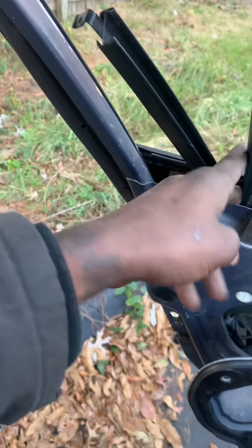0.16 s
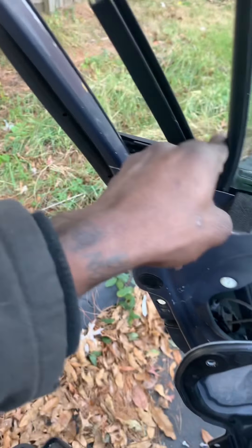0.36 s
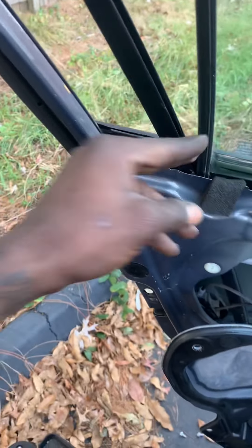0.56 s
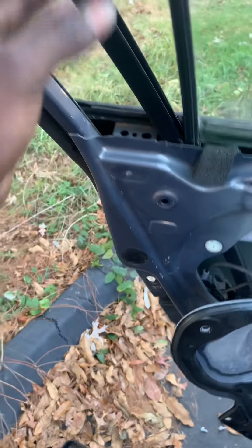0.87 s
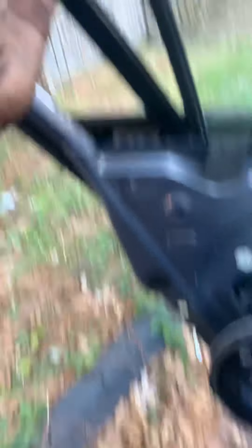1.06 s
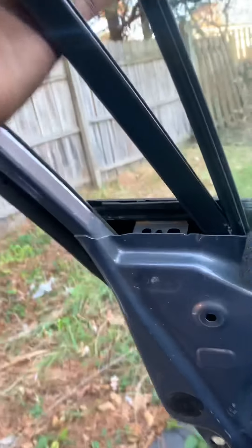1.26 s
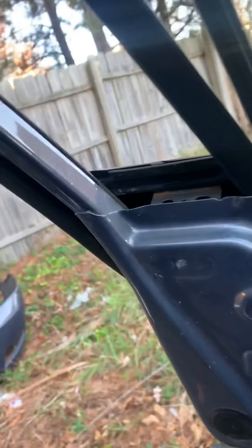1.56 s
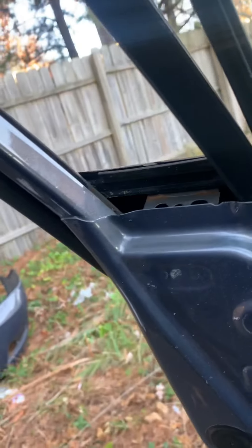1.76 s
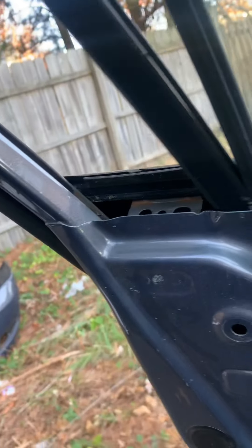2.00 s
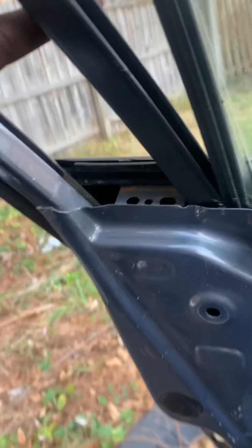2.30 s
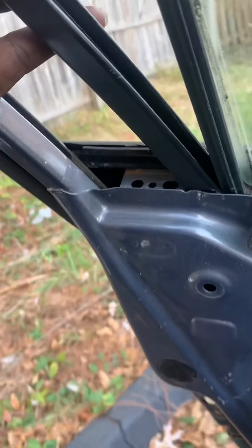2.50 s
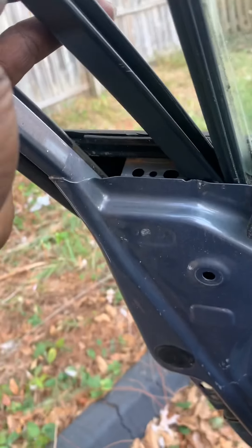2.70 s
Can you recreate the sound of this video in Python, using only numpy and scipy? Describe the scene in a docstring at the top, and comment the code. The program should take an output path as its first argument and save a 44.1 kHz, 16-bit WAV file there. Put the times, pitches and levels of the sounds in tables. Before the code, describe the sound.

Metal clicks, clunks and short scrapes from a window track wiggled in a hollow car door.

```python
"""Outdoors at a stripped car door, a stereo microphone pair close to its loose window track.
A hand works the track to and fro: it scrapes in its seat, clicks against the frame and rings.
Each knock spreads into the sheet metal as a clunk, and just after it the hollow door booms.
A jacket sleeve brushes softly; farther off lie a low rumble and a soft outdoor hush."""
import sys
import numpy as np
from scipy import signal
from scipy.fft import rfft, irfft, next_fast_len
from scipy.io import wavfile
from scipy.ndimage import uniform_filter1d, map_coordinates

SR = 44100
rng = np.random.default_rng(int(sys.argv[2]) if len(sys.argv) > 2 else 0)


def unload_wav(signal):
    """Save mono or channel-first audio to the path in sys.argv[1] as 16-bit WAV at rate SR, clipped to [-1, 1]."""
    wavfile.write(
        sys.argv[1],
        SR,
        np.round(np.clip(np.atleast_2d(signal).T, -1, 1) * 32767).astype(np.int16),
    )


N = 125685


# knocks of the track: t/s, click level/dB, click treble tilt/(dB/octave), click bite f/Hz,
# clunk level/dB, relative boom level/dB, boom tilt/(dB/octave), boom lag/s
KNOCKS = [(.205, -69, 0, 7200, -39, -26.5, -7, 0.0063), (0.3448, -28, 1, 4350, -29.5, -16, 1, .015),
          (0.5413, -41, 4, 6950, -32, -22, 1.5, .014), (0.677, -51, -2, 6070, -48.5, -39, -0.5, .012),
          (.936, -61, -1, 6900, -50, -33, 5.5, .012), (1.182, -49, -8, 6200, -47, -40.5, -1, .01),
          (1.29, -52.5, 11.5, 13400, -54, -63, -2, 0.013), (1.632, -57, 11, 8000, -57, -33, -4.5, 0.00866),
          (1.927, -52, -1, 5200, -53.5, -77, 4, .01), (2.045, -46, -6, 8000, -44, -35, 9, 0.01056),
          (2.1406, -32.5, 0.5, 5300, -37, -27, 2.5, 0.0084),
          (2.3465, -32.5, 0.5, 3270, -38, -33, 7.5, .012),
          (2.4929, -43.5, 0, 9300, -38, -27.5, -2, 0.01106), (2.688, -55.5, 0, 9100, -46, -45, 13, .01)]
# click spectrum before tilt and bite: f/Hz, relative level/dB
CLICK_SPECTRUM = [(400, 4), (1200, -2), (1750, -4), (2200, 2), (2900, 5), (5200, 3), (7000, -1),
                  (10000, 0.5), (16000, -15.5)]
# left-right likeness close to the microphones: f/Hz, likeness/0-1
NEAR_LIKENESS = [(200, .99), (600, .93), (1300, .78), (3000, .9), (5000, .97), (15000, .95)]

def clicks():
    """Close up, the track snaps against the frame with a bright crack and rings briefly."""
    rise_s, hold_s, bite_db, bite_octaves = 0.002, 0.0029, 6.5, 0.13
    chatter = coloured(white(), CLICK_SPECTRUM, NEAR_LIKENESS)
    crack = np.zeros((2, N))
    for start, db, tilt_db, bite_hz, *_ in KNOCKS:
        snap = burst(start, rise_s, hold_s, t60=0.04)
        tail = amp(-18.5) * burst(start, rise_s, hold_s, t60=0.11)
        # the point of contact favours one band
        bite = lambda hz: bite_db * np.exp(-(np.log2((hz + 1) / bite_hz) / bite_octaves) ** 2)
        colour = lambda hz: amp(tilt_db * np.log2(hz + 1000) + bite(hz))
        crack += amp(db) * (snap + tail) * unit(filtered(chatter, colour))
    return crack + amp(-4) * track_ring(crack)


# strokes of the track: start t/s, end t/s, relative levels of rasp/dB, hiss/dB, drone/dB
STROKES = [(0.188, 0.249, -60, -57, -44.5), (0.256, 0.318, -56.5, -70, -51), (0.463, 0.52, -48, -57.5, -56),
           (0.53, 0.57, -47, -45, -47), (0.869, 1.118, -62, -69.5, -45.5), (1.134, 1.303, -62, -65.5, -51),
           (1.32, 1.427, -62.5, -78, -49.5), (1.446, 1.519, -53.5, -69, -45.5),
           (1.517, 1.603, -53.5, -46, -46), (1.617, 1.684, -45.5, -39.5, -37.5),
           (1.79, 1.804, -52, -68, -66), (1.928, 2.051, -52, -60, -72), (2.048, 2.121, -59.5, -52.5, -44.5),
           (2.135, 2.229, -56, -64.5, -36.5), (2.274, 2.351, -39, -53, -52),
           (2.369, 2.404, -49.5, -43, -40), (2.435, 2.466, -49, -55, -43.5),
           (2.509, 2.514, -40, -37.5, -29), (2.566, 2.682, -61, -73.5, -60),
           (2.683, 2.709, -54.5, -49, -47), (2.736, 2.88, -66, -68.5, -50.5)]
# spectra of the rasping track, hissing seal and droning door: f/Hz, relative level/dB
RASP_SPECTRUM = [(60, -60), (300, -20), (1000, -6), (1900, -3.5), (2250, -3), (2900, -2.5), (3800, 1.5),
                 (5200, -8.5), (7000, -15), (16000, -54)]
HISS_SPECTRUM = [(200, -50), (900, -24), (1900, 2.5), (3500, -10), (5000, -24), (6000, 3.5), (7000, 2),
                 (9000, 1), (11500, 0.5), (13500, -2), (16000, -5.5)]
DRONE_SPECTRUM = [(25, -57), (60, 0), (120, -5), (190, 3), (255, 0.5), (300, -6), (360, -4.5), (450, -6),
                  (550, -15), (1200, -24.5), (2500, -32), (8000, -67)]

def scrapes():
    """Each stroke rasps through the track's modes, hisses along the seal and sets the door droning."""
    fade_db, hard_rub_db = -1.5, -43.5
    fade = lambda start, end: amp(fade_db * np.minimum(since(start) / (end - start), 1))
    rasp_level, hiss_level, drone_level = sum(
        amp(dbs)[:, None] * gate(start, end) * fade(start, end) for start, end, *dbs in STROKES)
    grip = amp(1.87 * wobble(rate=70) + 0.91 * wobble(rate=350))
    rasp = grip * rasp_level * coloured(shifting(slips(), depth_db=5), RASP_SPECTRUM, NEAR_LIKENESS)
    hiss = grip * hiss_level * coloured(shifting(slips(), depth_db=4.5), HISS_SPECTRUM, NEAR_LIKENESS)
    drone = drone_level * coloured(shifting(white(), depth_db=4.5), DRONE_SPECTRUM, NEAR_LIKENESS)
    pressure = (rasp_level / amp(hard_rub_db)) ** 0.32  # the harder the rub, the more the metal sings
    return amp(-1.5) * rasp + amp(-4) * track_ring(pressure * rasp) + hiss + drone


def slips():
    """Friction force: tiny slips of uneven size over a smooth rub."""
    slips_per_s, spread_db, power_share = 1800, 3, 0.38
    slipping = rng.random((2, N)) < slips_per_s / SR
    grains = slipping * white() * amp(spread_db * white())
    return np.sqrt(power_share) * unit(grains) + np.sqrt(1 - power_share) * white()


def shifting(pair, depth_db):
    """Narrow resonances come and go as the contact point moves."""
    spectra = signal.stft(pair, nperseg=1024)[2]
    peaks = uniform_filter1d(rng.standard_normal(spectra.shape[1:]), size=3, axis=0)
    drifting_peaks = uniform_filter1d(peaks, size=7, axis=1)
    return signal.istft(spectra * amp(depth_db * unit(drifting_peaks)), nperseg=1024)[1][:, :N]


# modes of the metal track: f/Hz, relative level/dB, t60/s
TRACK_MODES = [(1970, -3.5, 0.082), (2546, 2.5, 0.05), (2745, 0, 0.04), (2877, -0.5, 0.078),
               (3150, -4, 0.029), (3420, -5, 0.089), (3720, -10, 0.074), (4187, -1, 0.035),
               (5180, -23, 0.028), (5190, 11, .025), (6920, 1, .025), (8370, 6.5, .04), (9160, 6, 0.023)]

def track_ring(force):
    """A force drives the track's quickly dying modes."""
    t = np.arange(SR // 4) / SR
    ring = sum(amp(db - 60 * t / t60) * np.sin(2 * np.pi * (hz * t + rng.random()))
               for hz, db, t60 in TRACK_MODES)
    return signal.fftconvolve(force, ring[None] / np.linalg.norm(ring), axes=1)[:, :N]


# spectrum of the knocked sheet metal: f/Hz, relative level/dB
CLUNK_SPECTRUM = [(30, -53), (100, -12), (300, -1), (450, 2), (600, -2), (800, 1), (1300, -11.5),
                  (1800, -15), (2200, -18.5), (8000, -30), (16000, -43)]

def clunks():
    """Each knock spreads into the crowded middle modes of the door's sheet metal."""
    lag_s = 0.0028
    envelope = sum(amp(db) * burst(start + lag_s, rise=0.0017, hold=0.012, t60=0.15)
                   for start, _, _, _, db, *_ in KNOCKS)
    return envelope * coloured(shifting(white(), depth_db=4.5), CLUNK_SPECTRUM, NEAR_LIKENESS)


# modes of the hollow door: f/Hz, relative level/dB, t60/s
DOOR_MODES = [(71, -14, 0.36), (102.8, -18.5, .5), (130.1, -10, 0.35), (180.5, 1.5, 0.22), (197.5, 4, 0.13),
              (226.2, -10.5, 0.41), (260.7, -4, 0.27), (333.3, -9.5, .15), (359.8, -11.5, 0.1),
              (443.5, -14, 0.16), (449, -20.5, 0.09), (533, -25, 0.084), (773, -18, 0.15)]

def booms():
    """The door's low modes swell a moment after each knock, in a balance that varies by knock."""
    rise_s, gain_db = 0.0053, 3
    hz, mode_db, t60 = np.transpose(DOOR_MODES)[:, :, None]
    boom = np.zeros(N)
    for start, *_, db, tilt_db, lag in KNOCKS:
        t = since(start + lag)
        gains = amp(mode_db + tilt_db * np.log2(hz))
        modes = gains * amp(-60 * t / t60) * np.sin(2 * np.pi * hz * t)
        ring = np.sqrt(2) * modes.sum(axis=0) / np.linalg.norm(gains)
        boom += amp(db + gain_db) * ring * (1 - np.exp(-t / rise_s))
    return boom


# sleeve rustles as the hand changes grip: start t/s, end t/s, level/dB
RUSTLES = [(0.864, 1.04, -56), (1.042, 1.235, -52)]
# spectrum of the cloth: f/Hz, relative level/dB
SLEEVE_SPECTRUM = [(40, -46), (200, 14.5), (500, 4.5), (1100, 11.5), (1600, -1), (2500, -9), (6000, -45)]
# left-right likeness farther from the microphones: f/Hz, likeness/0-1
FAR_LIKENESS = [(150, 1), (400, 0.64), (900, 0.44), (2000, 0.54), (8000, 1)]

def sleeve():
    """The jacket sleeve brushes softly while the arm moves."""
    envelope = sum(amp(db) * gate(start, end) for start, end, db in RUSTLES)
    return envelope * amp(3.2 * wobble(rate=19)) * coloured(white(), SLEEVE_SPECTRUM, FAR_LIKENESS)


# rise and fall of the rumble: t/s, relative level/dB
RUMBLE_LEVELS = [(0, -51.5), (.45, -39), (.85, -47), (1.35, -44.5), (1.95, -46.5), (2.2, -39),
                 (2.42, -40.5), (2.57, -42.5), (2.85, -44)]
# spectra of the background: f/Hz, relative level/dB
RUMBLE_SPECTRUM = [(20, -24), (35, -29), (50, -9.5), (62, -1), (72, -3), (84, -12), (103, 1.5), (122, -7.5),
                   (170, -17.5), (300, -30.5), (600, -35), (2000, -106)]
HUSH_SPECTRUM = [(25, -19), (100, 5.5), (300, 4.5), (550, -5), (800, -2), (1150, -2), (1600, -8.5),
                 (2200, -17.5), (4000, -19.5), (8000, -31), (16000, -38.5)]

def outdoors():
    """Well behind the door, a low wavering rumble and a soft hush, as of far traffic."""
    rumble_db = np.interp(np.arange(N) / SR, *np.transpose(RUMBLE_LEVELS)) + 1
    rumble = amp(rumble_db) * coloured(white(), RUMBLE_SPECTRUM, FAR_LIKENESS)
    hush = amp(-53 + 1.8 * wobble(rate=6)) * coloured(white(), HUSH_SPECTRUM, FAR_LIKENESS)
    return rumble + hush


def amp(db):
    """Decibels to gain."""
    return 10 ** (np.asarray(db) / 20)


def unit(x):
    """Scaled to rms 1."""
    return x / np.sqrt(np.mean(x ** 2) + 1e-20)


def along(points, hz):
    """(f/Hz, value) points read on a log frequency axis."""
    freqs, values = np.transpose(points)
    return np.interp(np.log(hz + 1), np.log(freqs + 1), values)


def since(start):
    """Seconds after start, zero before it."""
    return np.maximum(np.arange(N) / SR - start, 0)


def burst(start, rise, hold, t60):
    """Envelope of a contact: rise, hold and decay, in seconds."""
    return (1 - np.exp(-(since(start) / rise) ** 2)) * amp(-60 * since(start + hold) / t60)


def gate(start, end, rise_s=0.013, fall_s=0.014):
    """Soft-edged envelope of a hand movement."""
    t = np.arange(N) / SR
    return (1 + np.tanh((t - start) / rise_s)) * (1 + np.tanh((end - t) / fall_s)) / 4


def wobble(rate):
    """A smooth random curve, rate knots a second."""
    return map_coordinates(rng.standard_normal(1024), [np.arange(N) * rate / SR], mode="wrap")


def white():
    """Two unrelated white noises."""
    return rng.standard_normal((2, N))


def filtered(x, response):
    """x through a complex frequency response."""
    size = next_fast_len(N + SR // 2)
    return irfft(rfft(x, size) * response(np.fft.rfftfreq(size, 1 / SR)), size)[..., :N]


def coloured(pair, spectrum, likeness):
    """Two unrelated signals as stereo of rms 1 with the given spectrum and left-right likeness."""
    def response(hz):
        width = np.arccos(np.clip(along(likeness, hz), -1, 0.999)) / 2
        return amp(along(spectrum, hz)) * [np.cos(width), np.sin(width)]
    mid, side = filtered(pair, response)
    return unit(np.array([mid + side, mid - side]))


def scene():
    """The door up close, the arm beside it and the open air behind."""
    return clicks() + clunks() + booms() + scrapes() + sleeve() + outdoors()


# phase of the left microphone relative to the right: f/Hz, phase/rad
LEFT_PHASE = [(0, 0), (250, -.45), (460, -1.3), (700, -3.1), (1400, -5.7), (2000, -5.1), (2250, -4),
              (3700, -4.7), (6400, -.2), (7500, .3), (8500, 2.9), (9500, 3.4), (10500, 6.1), (11600, 6.4),
              (12500, 9), (13700, 9.6), (14600, 12.5)]
# level of the left microphone relative to the right: f/Hz, level/dB
LEFT_LEVEL = [(60, -1.8), (110, -2), (200, -4.5), (430, -1.5), (750, -5.5), (1300, -0.5), (3000, 0),
              (8000, 0)]

def record(dry):
    """The microphone pair shifts phase and level between channels and cuts deep bass and top treble."""
    low_cut_hz, top_hz = 44, 15950
    sides = np.array([[0.5], [-0.5]])
    balance = lambda hz: amp(sides * along(LEFT_LEVEL, hz))
    phase = lambda hz: np.exp(1j * sides * np.interp(hz, *np.transpose(LEFT_PHASE)))
    low_cut = lambda hz: (1j * hz) ** 2 / (low_cut_hz ** 2 - hz ** 2 + 1j * hz * low_cut_hz)
    return filtered(dry, lambda hz: balance(hz) * phase(hz) * low_cut(hz) * (hz < top_hz))


dry = scene()
out = record(dry)
unload_wav(out)
```